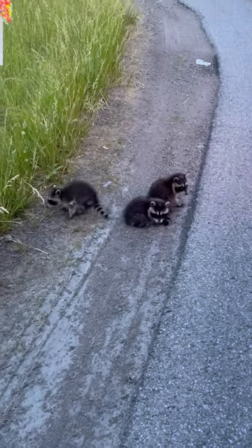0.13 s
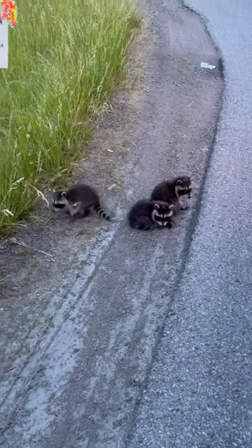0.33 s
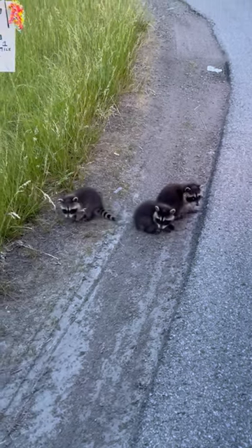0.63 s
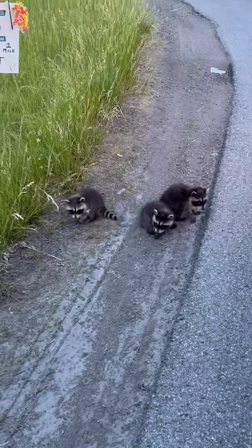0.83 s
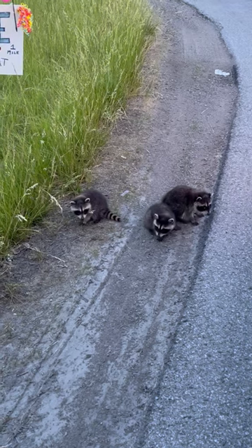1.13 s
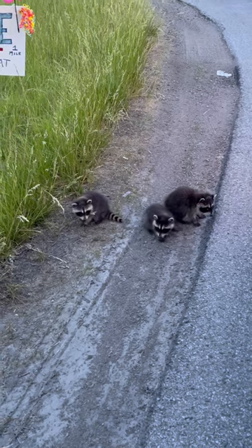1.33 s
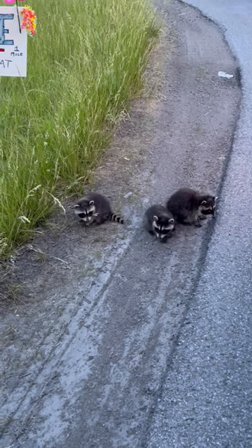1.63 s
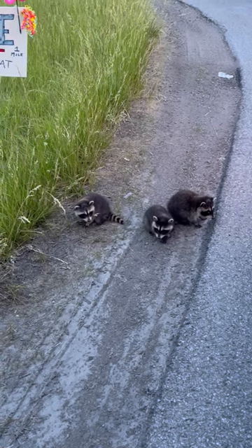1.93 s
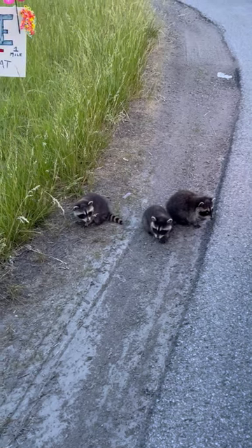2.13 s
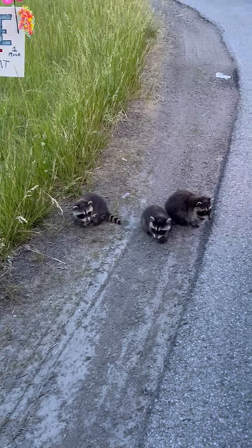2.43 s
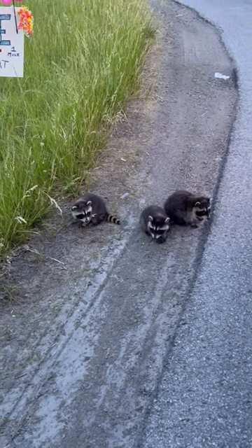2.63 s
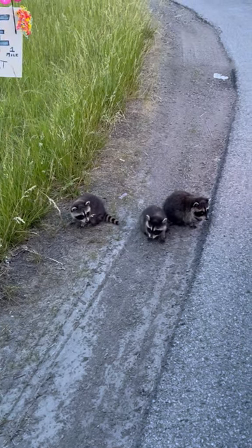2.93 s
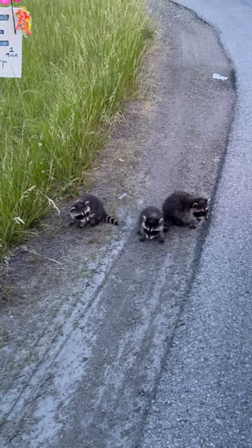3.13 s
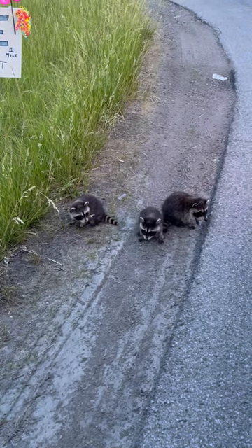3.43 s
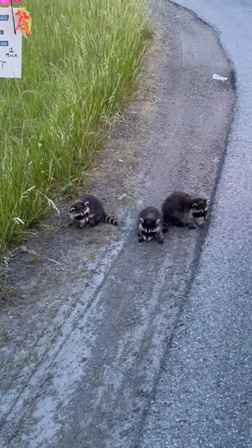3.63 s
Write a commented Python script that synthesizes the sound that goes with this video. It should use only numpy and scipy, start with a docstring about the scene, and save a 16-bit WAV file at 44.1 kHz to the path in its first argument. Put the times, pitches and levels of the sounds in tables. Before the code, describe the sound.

Baby raccoons chitter in three quick, high, raspy trills at a roadside, the last fainter. A loud low engine drone and tyre roar dominate, slowly easing, with faint relay ticking and soft thuds, in stereo.

```python
"""Tyre roar, low hums of fixed pitch and a slowing engine run throughout: shaped noise and sums of tones.
A relay tick-tocks in bursts of crackle while baby raccoons chitter at the roadside: short, sliding, raspy tones.
A second trill starts near 1 s among a few low thuds, whose tones sink in pitch; a third comes near 2.5 s.
Thin whistles, gliding tones with a fuzzy edge, pass now and then, mostly from 2.9 s; a last squeak follows.
The two microphone channels differ by a fixed phase and level colour."""
import sys
import numpy as np
from scipy import signal
from scipy.fft import rfft, irfft, next_fast_len
from scipy.io import wavfile
from scipy.ndimage import uniform_filter1d

SR = 44100
rng = np.random.default_rng(int(sys.argv[2]) if len(sys.argv) > 2 else 0)


def master_out(mix):
    """Clip the mix to full scale and print it as 16-bit PCM to the path in sys.argv[1]."""
    frames = np.transpose(np.atleast_2d(mix))
    ceiling = np.clip(frames, -1, 1)
    pcm = np.round(ceiling * 32767).astype(np.int16)
    wavfile.write(sys.argv[1], SR, pcm)


def to_linear_factor(level_db):
    """Convert decibel levels (scalar or array-like) to linear amplitude factors."""
    exponent = np.asarray(level_db, float) / 20
    return 10 ** exponent


N = 167139  # length in samples


def evened(x):
    """Scales a signal to an rms of 1."""
    return x / np.sqrt(np.mean(abs(x) ** 2) + 1e-20)


def read(points, hz):
    """Reads a table between its points, on a log-frequency axis."""
    f, value = np.transpose(points)
    return np.interp(np.log(hz + 1), np.log(f + 1), value)


def add(mix, start_s, sound):
    """Mixes a sound in at start_s seconds, cutting it off where the mix ends."""
    part = mix[round(start_s * SR):][:len(sound)]
    part += sound[:len(part)]


def wobble(size, seconds):
    """Smooth, slowly wandering complex noise with an rms of 1."""
    a, b = rng.standard_normal((2, size))
    k = max(round(seconds * SR), 1)
    a = uniform_filter1d(uniform_filter1d(a, k), k)
    b = uniform_filter1d(uniform_filter1d(b, k), k)
    return evened(a + 1j * b)


def tone(hz):
    """Complex tone that follows a pitch curve from a random starting phase."""
    return np.exp(2j * np.pi * (np.cumsum(hz) / SR + rng.random()))


# Tone colour of the tyre roar: (frequency [Hz], relative level [dB per Hz])
ROAR_COLOUR = [(250, -24), (450, 0), (1200, 1.5), (2000, -8), (2600, -14), (4500, -23), (7000, -30),
               (10000, -37.5), (13000, -51)]
# Loudness of the roar over time: (time [s], level [dB])
ROAR_LEVEL = [(0, -42.5), (1.0, -43), (2.3, -46), (3.79, -47)]
# Tone colour of the low rumble: (frequency [Hz], relative level [dB per Hz])
RUMBLE_COLOUR = [(18, -35.5), (35, -5), (65, -3.5), (105, -3.5), (180, -2), (245, -6), (297, -5.5),
                 (345, -20.5), (385, -10.5), (500, -60.5)]
# How alike the road noise is in the two channels: (frequency [Hz], likeness [0 to 1])
LIKENESS = [(150, 1), (300, .97), (500, .75), (900, .58), (1200, .83), (1550, .47), (2100, .94)]


def road():
    """Tyre roar and rumble: patchy noise coloured by frequency, partly unlike in the two channels."""
    rumble_db, patchy_db = -36, 1
    treble_steady = 0.063  # share of the roar's fading that the treble above 3 kHz ignores
    frames, hz = N // 512 + 5, np.fft.rfftfreq(2048, 1 / SR)
    a, b, c, d, patches = rng.standard_normal((frames, 1025, 5)).T
    patches = evened(uniform_filter1d(uniform_filter1d(patches, 20, 0), 8, 1))

    t = np.arange(frames) * 512 / SR
    level_db = np.interp(t, *np.transpose(ROAR_LEVEL))
    share = treble_steady * np.clip(hz / 3000, 0, 1)[:, None] ** 2
    roar_db = level_db + share * (level_db.mean() - level_db)
    roar = evened(to_linear_factor(read(ROAR_COLOUR, hz)))[:, None] * to_linear_factor(roar_db)
    rumble = evened(to_linear_factor(read(RUMBLE_COLOUR, hz)))[:, None] * to_linear_factor(rumble_db)
    loudness = np.hypot(roar, rumble) * to_linear_factor(patchy_db * patches)

    same = np.clip(read(LIKENESS, hz), 0, 1)[:, None]
    left = a + 1j * b
    right = same * left + np.sqrt(1 - same ** 2) * (c + 1j * d)
    unit = np.std(signal.istft(left, nperseg=2048, noverlap=1536)[1])
    noise = signal.istft(np.array([left, right]) * loudness, nperseg=2048, noverlap=1536)[1]
    return noise[:, :N] / unit


def wavering(lines):
    """Sums (unit-peak wave, middle level [dB rms]) lines, each drifting in level at random."""
    waver_db, waver_s = 1.2, .15
    return sum(np.sqrt(2) * to_linear_factor(db + waver_db * wobble(N, waver_s).real) * wave for wave, db in lines)


# Low hums: (pitch [Hz], middle level [dB rms])
HUM_TONES = [(36.4, -46), (50, -42), (59.1, -41.5), (73, -39)]


def hums():
    """Low tones of fixed pitch, as lines for wavering()."""
    return [(tone(hz * np.ones(N)).real, db) for hz, db in HUM_TONES]


# Low thuds: (time just after the swell peaks [s], swell peak [dB], base pitch, scaled by the sink [Hz])
THUD_EVENTS = [(.93, -22.5, 58.2), (1.135, -20.5, 54.4), (1.545, -23.5, 64), (2.15, -21.5, 64.2),
               (2.76, -25, 70.5)]


def thuds():
    """Low pushes of a few cycles that start fast and sink in pitch."""
    length_s, sag = 0.093, 1
    out = np.zeros(N)
    for centre, peak_db, hz in THUD_EVENTS:
        u = np.arange(0, 2 * length_s, 1 / SR) / length_s * 4
        swell = u * np.exp(1 - u)
        sinking_hz = hz * (0.799 + sag * np.exp(-u))
        add(out, centre - length_s / 3, to_linear_factor(peak_db) * swell * tone(sinking_hz).real)
    return out


# Tone colour of the relay, before the bass is thinned: (frequency [Hz], relative level [dB])
RELAY_COLOUR = [(5500, -6), (10800, -9), (12600, 0), (16000, -20)]


def relay():
    """Even tick-tock: a bright dry crackle that dies away fast, the tock weaker."""
    first_s, every_s, tock_late_s = .376, .6746, .352
    tick_db, tock_db, t60_s = -58, -67, .04  # t60: time to fade by 60 dB
    out, t = np.zeros(N), np.arange(2048) / SR
    bass_thinning = np.fft.rfftfreq(2048).clip(0, .1)
    colour = to_linear_factor(read(RELAY_COLOUR, np.fft.rfftfreq(2048, 1 / SR))) * bass_thinning
    for k in range(-1, 6):
        for late, db in ((0, tick_db), (tock_late_s, tock_db)):
            start_s = first_s + k * every_s + late
            crackle = evened(irfft(rfft(rng.standard_normal(2048)) * colour))
            if start_s > 0:
                fade = np.minimum(t / .004, 1) * to_linear_factor(db - 60 * t / t60_s)
                add(out, start_s, crackle * fade)
    return out


# Thin gliding tones, most faint and high, one low, one a tyre whine: (start [s], length [s],
# start pitch [Hz], end pitch [Hz], fuzz width [Hz], level before the fades [dB rms])
WHISTLE_EVENTS = [(.125, .045, 4200, 4050, 120, -60), (1.79, .13, 12000, 9500, 2000, -71),
                  (2.905, .04, 5400, 4800, 1500, -62), (2.92, .14, 7350, 7350, 80, -75),
                  (2.99, .19, 5400, 5200, 200, -69), (2.9, .22, 10700, 10700, 100, -80),
                  (2.9, .89, 1100, 1170, 350, -52), (0, .95, 75, 93, 3, -39),
                  (3.315, .07, 5450, 4950, 400, -65), (3.39, .11, 5450, 5150, 220, -67),
                  (3.5, .13, 5550, 5250, 160, -68)]


def whistles():
    """Gliding tones made fuzzy by a random wobble, with soft ends."""
    out = np.zeros(N)
    for start, length, from_hz, to_hz, width, db in WHISTLE_EVENTS:
        hz = np.linspace(from_hz, to_hz, round(length * SR))
        fuzzy = (tone(hz) * wobble(len(hz), .4 / width)).real
        add(out, start, to_linear_factor(db + 3) * np.hanning(len(hz)) ** .4 * fuzzy)
    return out


# Slowing of the engine: (time [s], cycle rate [Hz])
ENGINE_RATE = [(0, 16.9), (.3, 16.65), (.7, 15.75), (1.1, 15.14), (1.5, 14.45), (1.9, 13.68), (2.3, 13.37),
               (3.35, 13.3), (3.79, 12.75)]
# Strength of the engine's orders (multiples of the cycle rate), from the 7th up, before the
# exhaust and load act: (level [dB rms])
ORDER_LEVELS = [-38.5, -30, -35, -31, -38, -31.5, -38.5, -30, -29, -30.5]
# How the exhaust passes each pitch: (frequency [Hz], gain [dB])
EXHAUST_GAIN = [(105, -20), (125, -9), (138, -13), (160, 0), (200, -12), (270, -24)]


def engine():
    """Orders of the slowing engine, heard through its exhaust, as lines for wavering()."""
    first_order = 7
    load_db_per_hz = 1.2  # the engine quietens as it slows
    smear_rad = 2.05  # phase per order squared: the pipe smears the firings into an even drone
    rate = np.interp(np.arange(N) / SR, *np.transpose(ENGINE_RATE))
    cycle = np.unwrap(np.angle(tone(rate)))
    load_db = load_db_per_hz * (rate - rate.mean())
    lines = []
    for k, db in enumerate(ORDER_LEVELS, first_order):
        wave = np.cos(k * cycle + smear_rad * k * k)
        lines.append((wave, db + load_db + read(EXHAUST_GAIN, k * rate)))
    return lines


# Chitter pulses: (time [s], level, 5 dB under the peak of the swell [dB], pitch before its slide [Hz],
# upper partial [Hz], upper partial against the main tone [dB])
CHIT_EVENTS = [(0.1583, -55, 4100, 5000, -12), (0.1831, -53, 4150, 6160, -18),
               (0.2141, -51.5, 4220, 6290, -16), (0.2461, -52.5, 4300, 6400, -8),
               (0.2782, -54, 4280, 6350, -4), (0.3096, -49, 4300, 6400, -9), (0.351, -49.5, 4220, 6350, -9),
               (0.3862, -48, 4380, 6830, -24), (0.95, -48.5, 4270, 8200, -20),
               (0.9926, -46.5, 4330, 8300, -19), (1.0337, -47, 4350, 7900, -15),
               (1.0774, -48, 4250, 7900, -20), (1.1153, -44.5, 4440, 7890, -13),
               (1.1587, -48.5, 4370, 7800, -13), (1.1984, -48.5, 4430, 7950, -11),
               (1.2415, -51, 4440, 8840, -6), (1.2831, -48, 4300, 8560, -10),
               (1.3272, -50, 4290, 8300, -12), (1.3793, -52.5, 4060, 8500, -10),
               (1.4393, -59, 4500, 7900, -10), (2.0393, -61, 5400, 8600, -6), (2.4787, -66, 5550, 7950, -3),
               (2.5254, -64, 5700, 7950, -1), (2.5715, -58.5, 5750, 8000, -4),
               (2.6192, -63, 5700, 8000, -10), (2.6640, -58.5, 5750, 7950, -11),
               (2.7093, -60, 5700, 7960, -7), (2.7560, -59.5, 5580, 8900, -12),
               (2.8022, -59.5, 5600, 9000, -16), (2.8550, -57, 5380, 8750, -17),
               (3.644, -63, 5150, 7500, -15)]
# When each animal's voice takes over: (time [s])
VOICE_STARTS = [0, .6, 1.8]
# One voice per animal: (length setting, the swell lasts 1.6 times this [s],
# half the pitch drop by the end, negative rises [share], breath setting against the main tone [dB])
ANIMAL_VOICES = [(.0098, -.025, -25), (.0078, .045, -27), (.0105, .015, -22)]
# Side partials of each voice: (ratio to the pitch [times], level against the main tone [dB])
VOICE_PARTIALS = [
    [(3.0, -28), (1.08, -8)],
    [(2.87, -23), (1.5, -17)],
    [(.8, -3), (1.2, -14)],
]


def chitter():
    """Raccoon squeaks: a sliding whistle, raspy partials around it and a puff of air under a short swell."""
    rough, upper_rough, rough_s = .32, .5, .0007  # rough: share of each tone that flutters
    out = np.zeros(N)
    for centre, peak_db, hz, upper_hz, upper_db in CHIT_EVENTS:
        voice = np.searchsorted(VOICE_STARTS, centre) - 1
        length, drop, puff_db = ANIMAL_VOICES[voice]
        u = np.linspace(-1, 1, round(1.6 * length * SR))
        puff = to_linear_factor(puff_db) * np.diff(rng.standard_normal(len(u) + 1))
        main = tone(hz * (1 - drop * u * (1 + u)))
        sound = puff + main * (1 - rough + rough * wobble(len(u), rough_s))
        partials = [(upper_hz, upper_db)] + [(hz * ratio, db) for ratio, db in VOICE_PARTIALS[voice]]
        for f, db in partials:
            partial = to_linear_factor(db) * tone(f + 0 * u)
            sound = sound + partial * (1 - upper_rough + upper_rough * wobble(len(u), rough_s))
        swell = (1 - u) ** 2 * (1 + u) ** 1.5
        add(out, centre - .7 * length, to_linear_factor(peak_db + 5) * swell / swell.max() * sound.real)
    return out


def scene():
    """All sources; only the road noise differs between the channels."""
    near = wavering(engine() + hums())
    near = near + relay() + thuds() + chitter() + whistles()
    return near + road()


# Phase between the channels: (frequency [Hz], lead of the left [radians])
PHASE_LEAD = [(0, 0), (300, -.2), (900, -1), (1500, -.4), (2600, 2.2), (3800, .85), (5200, 1.7),
              (5800, 3.1), (6150, 3.2), (8000, 6.3), (9800, 9.4), (10900, 9.45), (12400, 12.6),
              (14300, 15.7)]
# Level between the channels: (frequency [Hz], left minus right [dB])
LEFT_EXCESS = [(400, 0), (800, 4.5), (1100, 3.5), (1750, 5.5), (2300, 0)]


def two_microphones(dry):
    """Splits a fixed phase and level difference evenly between the two channels."""
    size = next_fast_len(N + 4096)
    hz = np.fft.rfftfreq(size, 1 / SR)
    half_phase = .5 * np.interp(hz, *np.transpose(PHASE_LEAD))
    half = to_linear_factor(read(LEFT_EXCESS, hz) / 2) * np.exp(1j * half_phase)
    return irfft(rfft(dry, size) * np.array([half, 1 / half]), size)[:, :N]


def top_cut(x):
    """Nothing passes above the cut-off."""
    return signal.sosfilt(signal.butter(12, 13970, fs=SR, output="sos"), x)


def record(dry):
    """Gives the scene its two microphone channels and finishes the mix."""
    mix = two_microphones(dry)
    return top_cut(mix)


dry = scene()
out = record(dry)
master_out(out)
```